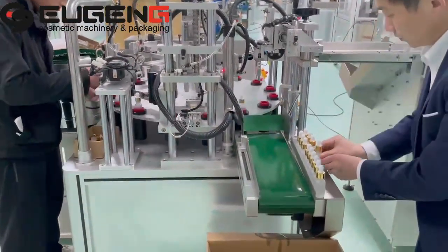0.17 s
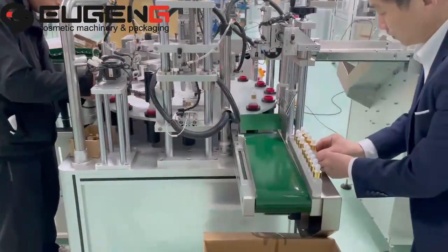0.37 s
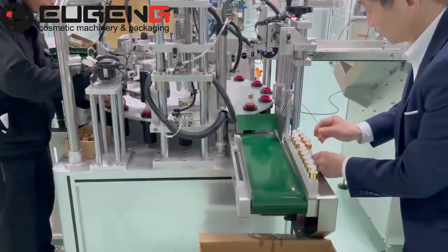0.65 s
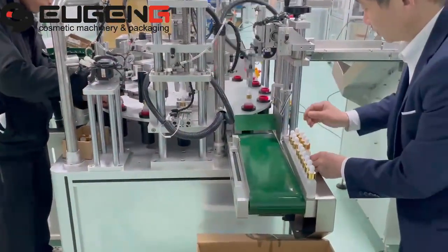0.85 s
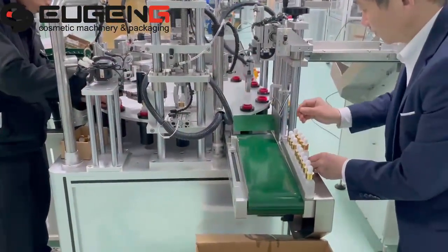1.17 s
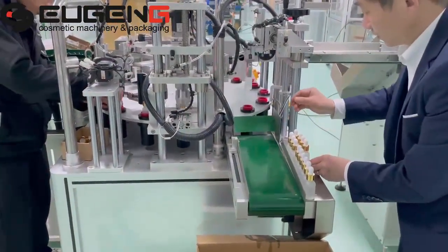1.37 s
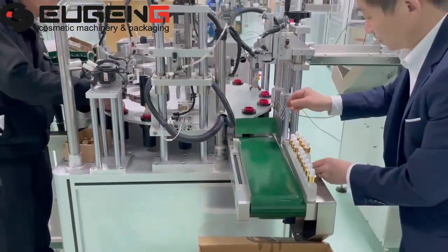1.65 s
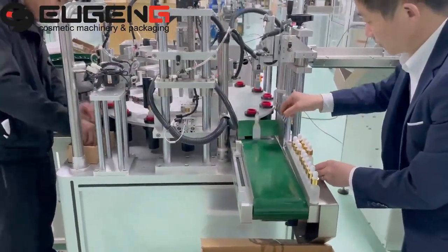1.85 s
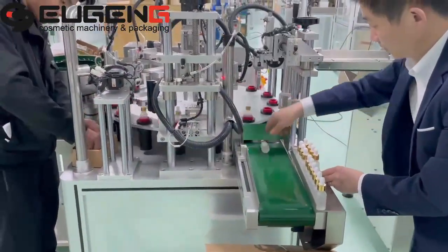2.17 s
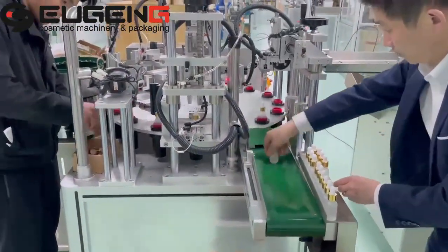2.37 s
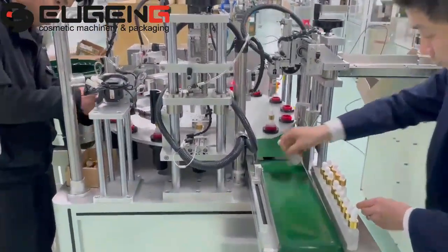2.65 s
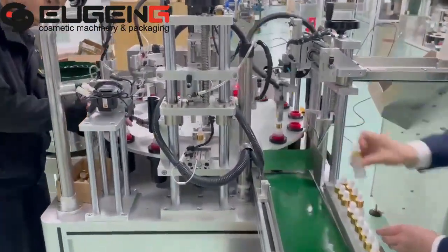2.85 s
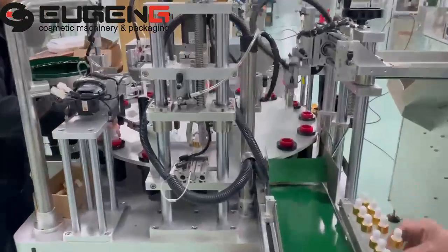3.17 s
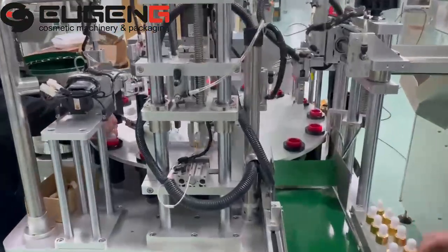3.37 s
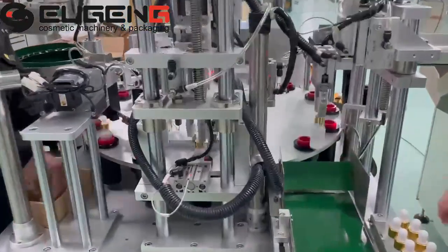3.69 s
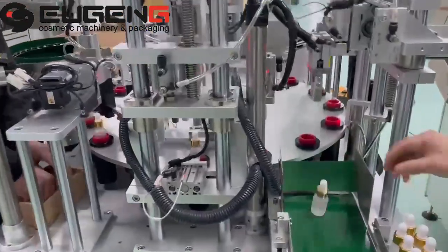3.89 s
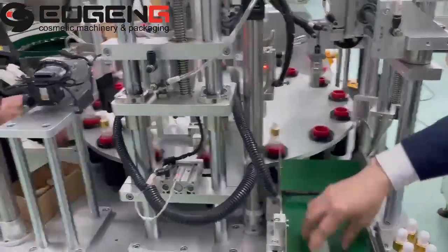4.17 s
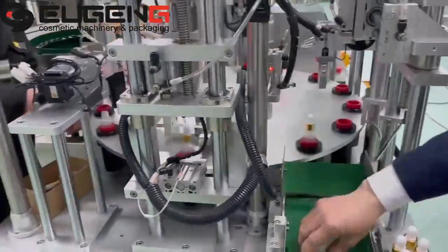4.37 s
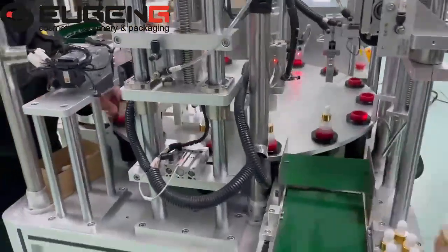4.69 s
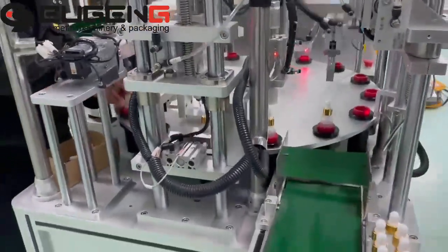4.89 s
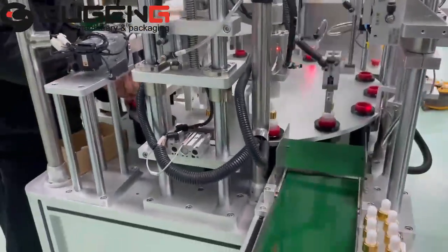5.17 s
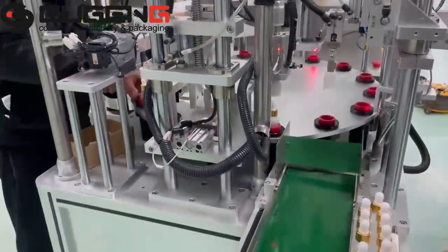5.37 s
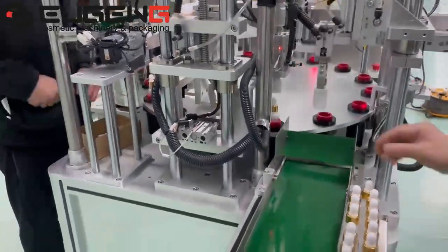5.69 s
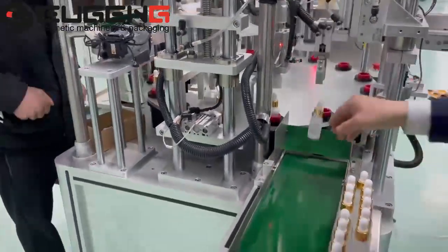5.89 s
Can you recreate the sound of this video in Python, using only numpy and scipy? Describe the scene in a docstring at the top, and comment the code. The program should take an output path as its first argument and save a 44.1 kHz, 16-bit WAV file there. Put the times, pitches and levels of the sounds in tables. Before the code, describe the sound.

An indexing assembly machine clacks and slams in uneven cycles, with air hisses, metallic rings, low cabinet booms and a brief glassy bottle knock in a factory hall.

```python
"""Filling and capping machine in a factory hall

An indexing machine works through its steps close to a two-port microphone. Blows are bursts of shaped
noise with small pings; rods, plates, guards and other parts ring as dying sines, and the steel cabinet
booms with low sines. Air hiss and rumble are noise that swells with each stroke. Motor tones come and
go over the steady wash of the hall, and random reflections give the blows and rings an echo.
"""
import sys
import numpy as np
from scipy import signal
from scipy.fft import rfft, irfft
from scipy.io import wavfile
from scipy.ndimage import uniform_filter1d

SR = 44100
rng = np.random.default_rng(int(sys.argv[2]) if len(sys.argv) > 2 else 0)


def store_wav(level_fs):
    """Save 16-bit WAV to argv[1]."""
    pcm = np.round(np.clip(np.atleast_2d(level_fs), -1, 1) * 32767)
    wavfile.write(sys.argv[1], SR, pcm.T.astype(np.int16))


N = 266364  # length [samples]


def amp(db):
    """Turns a level in dB into a gain."""
    return 10 ** (np.asarray(db) / 20)


def evened(x):
    """Scales a signal to an average (rms) strength of 1."""
    return x / np.sqrt(np.mean(x ** 2) + 1e-20)


def smoothed_twice(x, size):
    """Averages over neighbours two times, so that only slow changes remain."""
    return uniform_filter1d(uniform_filter1d(x, size=size), size=size)


def read(points, hz):
    """Reads a (frequency [Hz], value) table, with straight lines on a log-frequency axis."""
    f, value = np.transpose(points)
    return np.interp(np.log(hz + 1), np.log(f + 1), value)


def add(mix, s, sound):
    """Mixes a sound in at s seconds and cuts off what runs past the end."""
    part = mix[:, round(s * SR):][:, :sound.shape[1]]
    part += sound[:, :part.shape[1]]


def colour(x, db_of):
    """Shapes the spectrum by a function that turns frequency into dB."""
    size = x.shape[-1]
    return irfft(rfft(x) * amp(db_of(np.fft.rfftfreq(size, 1 / SR))), size)


def noise(spectrum, patchy_db, size=1024):
    """Makes two unrelated noises of one spectrum, with shared louder and softer patches."""
    frames, hz = 4 * N // size + 5, np.fft.rfftfreq(size, 1 / SR)
    shape = (2, len(hz), frames)
    z = rng.standard_normal(shape) + 1j * rng.standard_normal(shape)
    patches = rng.standard_normal((len(hz), frames))
    patches = uniform_filter1d(patches, size=10, axis=0)  # over frequency
    patches = evened(uniform_filter1d(patches, size=8, axis=1))  # over time
    z = z * amp(read(spectrum, hz)[:, None] + patchy_db * patches)
    sound = signal.istft(z, nperseg=size, noverlap=3 * size // 4)[1]
    return evened(sound[:, :N])


def hum():
    """A motor hums while a drive runs: a wavering tone with a faint fourth harmonic."""
    # spells of motor tone: (start [s], end [s], pitch [Hz], level [dB])
    motor_spells = [(-0.05, 0.215, 161.4, -41), (0.36, 0.6, 157, -44), (4.337, 4.54, 207, -38),
                    (4.612, 4.922, 208.2, -39.5), (5.928, 6.1, 159.6, -28.5)]
    fade_s, waver_db = 0.054, 0.5
    out, t = np.zeros(N), np.arange(N) / SR
    for on, off, hz, db in motor_spells:
        tone = np.sin(2 * np.pi * hz * t) + 0.14 * np.sin(2 * np.pi * 4 * hz * t)
        fade = np.clip(np.minimum(t - on, off - t) / fade_s, 0, 1)
        out += amp(db) * fade * np.sqrt(2) * tone
    waver = evened(smoothed_twice(rng.standard_normal(N), 3000))
    return out * amp(waver_db * waver)


def wash():
    """The steady wash of the hall is patchy noise, strongest in the bass."""
    # colour of the hall's background: (frequency [Hz], relative level [dB])
    wash_colour = [(25, 6), (60, -5), (160, -5), (270, 0.5), (450, -19.5), (840, -11), (2000, -23),
                   (5700, -55), (9000, -38.5), (13000, -40.5), (16000, -55)]
    return amp(-38.5) * noise(wash_colour, 3.4, size=2048)


def working():
    """Exhaust air hisses and the cabinet rumbles: each stroke runs up fast and runs out slowly."""
    # station strokes: (time of full speed [s], exhaust air level [dB], its extra level above 6.5 kHz [dB],
    # cabinet rumble level [dB], run-out speed [dB/s])
    strokes = [(0.029, -44, 3, -34.5, 25), (0.39, -47, -5, -38, 52), (0.778, -33, 11, -27.5, 71),
               (1.016, -32.5, 5, -24.5, 67), (1.33, -30, -5, -21, 71), (1.45, -38, 6, -30.5, 4),
               (1.698, -21, 5, -16.5, 86), (1.93, -35, 10.5, -47, 23), (2.15, -32, -4, -26, 47),
               (2.701, -33.5, 8, -28.5, 74), (2.958, -32, 8, -25, 75), (3.23, -33, 6, -22.5, 46),
               (3.606, -20, 11, -17, 157), (3.918, -36, -7, -24.5, 58), (4.099, -35.5, 11.5, -29, 42),
               (4.85, -36, 12, -27, 48), (5.109, -32, 6.5, -28, 67), (5.398, -32.5, 2, -22.5, 57),
               (5.748, -17.5, 8, -18.5, 132), (6.02, -30.5, -6, -21.5, 52)]
    # colour of the exhaust air: (frequency [Hz], relative level [dB])
    air_colour = [(200, 8.5), (600, 4), (1500, 7), (3500, 1.5), (6000, -4), (9000, -14.5), (13000, -21.5),
                  (16000, -49)]
    # colour of the cabinet rumble: (frequency [Hz], relative level [dB])
    rumble_colour = [(30, -17), (50, 0), (65, 6.5), (80, -1.5), (105, -1), (135, -4), (270, -9.5),
                     (340, -13), (405, -5), (460, -14.5), (570, -11), (900, -52), (1500, -48)]
    run_up_db_per_s, hold_s = 314, 0.0053
    jet_fade_db_per_s = 74  # the jet loses its sharpness as the pressure drops
    idle_air_db, idle_rumble_db = -55, -41.5

    s, air_db, sharp_db, rumble_db, run_out = np.transpose(strokes)[:, :, None]
    frames = np.arange(0, N + 100, 100) / SR
    since = frames - s  # one row per stroke, negative before full speed
    run_out_db = -run_out * np.maximum(since - hold_s, 0)
    stroke_db = np.minimum(run_up_db_per_s * since, run_out_db)
    sharp_db = np.maximum(sharp_db - jet_fade_db_per_s * np.maximum(since, 0), -4)

    def level(db, idle_db):
        """Adds the power of all strokes to the idle level."""
        power = (amp(db + stroke_db) ** 2).sum(0) + amp(idle_db) ** 2
        return np.interp(np.arange(N) / SR, frames, np.sqrt(power))

    air = noise(air_colour, 2.97)
    top = signal.sosfilt(signal.butter(2, 6500, "high", fs=SR, output="sos"), air)
    low_jets = level(air_db, idle_air_db) * (air - top)
    high_jets = level(air_db + sharp_db, idle_air_db) * top  # fast jets hiss higher
    rumble = level(rumble_db, idle_rumble_db) * noise(rumble_colour, 1.76, size=4096)
    return low_jets + high_jets + rumble


def pings(t60, tilt):
    """Small loose parts knock at random times early in the rattle, each with one short ring of its own."""
    out, t = np.zeros((2, 16384)), np.arange(2048) / SR
    for late, pitch, size, turn in rng.random((7, 4)):  # seven parts
        hz = 602 * 2 ** (3.3 * pitch)  # up to 3.3 octaves above 602 Hz
        ring_s = 75 / np.sqrt(hz * 2000)  # time to fall 60 dB; 75 cycles at 2 kHz
        phase = 2 * np.pi * (hz * t + np.array([[0], [turn]]))
        ping = np.sin(phase) * amp(-60 * t / ring_s)
        db = -3.5 + read(tilt, hz) - 14.0 * late - 11 * size
        add(out, late * t60 / 3, amp(db) * ping)
    return out


def blows():
    """Each blow is a sharp crack and a rattle of loose parts; heavy kinds carry more low end."""
    # every blow: (time [s], level [dB], brightness from 5 kHz up [dB], kind)
    blow_list = [(0.077, -21, -18.5, "knock"), (0.213, -32, -30, "clink"), (0.343, -28.5, -1.5, "shudder"),
                 (0.594, -35.5, -2, "tick"), (0.653, -32, -18, "shudder"), (0.7563, -29, 4.5, "valve"),
                 (0.8, -28, -17, "release"), (0.9672, -25, -5, "index"), (0.981, -26.5, -24, "bounce"),
                 (1.275, -30, -6, "shudder"), (1.287, -17, -12, "clamp"), (1.3094, -20, -22, "bounce"),
                 (1.455, -37, 18, "valve"), (1.514, -12.5, -14, "clunk"), (1.5214, -18.5, -18, "plate"),
                 (1.6534, -13.5, -16, "press"), (1.6905, -6.5, -15, "cap"), (1.7118, -13, -5, "chatter"),
                 (1.7253, -10.5, -3, "chatter"), (1.7776, -29, -34, "bounce"),
                 (1.8743, -13.5, -7.5, "return"), (1.914, -23, -30, "latch"), (2.1097, -13.5, -8, "lift"),
                 (2.1244, -19.5, -20, "bounce"), (2.1594, -17.5, -25, "shudder"), (2.688, -29, 9, "valve"),
                 (2.7353, -14, 3, "chatter"), (2.9016, -22, -9, "index"), (2.925, -26.5, -1, "shudder"),
                 (3.0878, -16.5, -21.5, "clink"), (3.145, -32, 3, "tick"), (3.205, -29, -21, "shudder"),
                 (3.22, -14.5, -12.5, "clamp"), (3.2335, -18.5, -28, "shudder"),
                 (3.259, -19, -22, "shudder"), (3.3227, -26, -30, "bounce"), (3.5608, -10, -11.5, "press"),
                 (3.5755, -11.5, -27, "bounce"), (3.588, -11, -12, "chatter"), (3.596, -9, -14, "chatter"),
                 (3.6132, -4, -16, "cap"), (3.6254, -13, -7, "plate"), (3.778, -13, -8, "return"),
                 (3.8412, -20, -19, "latch"), (3.8596, -26, -11, "latch"), (4.0019, -19, -23, "latch"),
                 (4.0235, -11, -9.5, "lift"), (4.0679, -15, -5, "chatter"), (4.1193, -20, 0, "chatter"),
                 (4.415, -31.5, -20, "bounce"), (4.444, -39, -19, "bounce"), (4.828, -28.5, 6, "valve"),
                 (4.881, -22, -10, "release"), (4.952, -10.5, -14, "bottle"), (4.9603, -16, -23, "bottle"),
                 (5.029, -20.5, -13, "clink"), (5.0496, -20.5, -6, "index"), (5.0694, -27, -20, "shudder"),
                 (5.351, -26, -14, "shudder"), (5.366, -14, -16, "clamp"), (5.3852, -19.5, -20, "shudder"),
                 (5.439, -34, -10, "chatter"), (5.7067, -9.5, -17, "press"), (5.726, -21, -11, "bounce"),
                 (5.7441, -7, -12, "cap"), (5.76, -11, -17, "plate"), (5.784, -11, -7, "chatter"),
                 (5.801, -15, -10, "chatter"), (5.813, -14, -21, "chatter"),
                 (5.9342, -13.5, -5.5, "return"), (5.9552, -15, -12, "latch")]
    # how each kind sounds: (weight from 500 Hz down [dB], time for the rattle to fall 60 dB [s],
    # crack over rattle before they fade [dB], main ring [Hz], its boost [dB], attack [ms]);
    # rattle times under 0.01 s and attacks under 0.1 ms count as those
    kinds = {"valve": (1.1, 0.58, 9.9, 780, 13.7, 7.6), "release": (8, -0.2, -2.5, 971, 7, -1.5),
             "index": (13.4, 0.16, 1.3, 550, 2.5, 2.1), "clamp": (0.67, 0.17, 5.2, 1600, 3, 1.9),
             "press": (-0.5, 0.13, -4, 1147, 0, 2), "cap": (6, 0.0079, -10, 1242, -2, 1),
             "plate": (15.5, 0.07, -0.5, 759, 15, -1.1), "return": (0, 0.14, 4, 2400, 1.5, 2),
             "lift": (0.61, 0.15, 2.3, 1300, 2.3, 0.74), "bounce": (0.5, 0.0962, -5, 1203, 0.5, 0),
             "latch": (7.6, 0.13, 1.5, 1400, 11, 1.1), "bottle": (-11, 0.024, -6.5, 1497, 5, 0.3),
             "knock": (-11, 0.26, -8, 1060, 9.5, 0), "tick": (-32, 0.06, 3.5, 2500, 21, 3),
             "clunk": (2.5, 0.11, -3, 1098, 15.5, 1), "clink": (-10, 0.08, -9, 1750, -2, 3),
             "shudder": (14.5, 0.08, -17, 804, 5.5, 2), "chatter": (3, -0.0535, -12, 1300, 12, 0.3)}
    # colour of the rattle: (frequency [Hz], relative level [dB])
    clack_colour = [(60, -12), (250, 2), (700, 1), (1500, -2.5), (2500, 0), (4000, 0), (6000, 3.5),
                    (9000, -3), (13000, -43), (16000, -15)]
    # colour of the crack: (frequency [Hz], relative level [dB])
    crack_colour = [(300, -34), (1000, -4.5), (2000, -4), (5000, 2.5), (9000, 2.5), (13000, -2),
                    (16000, -7)]
    out = np.zeros((2, N))
    for s, db, bright_db, kind in blow_list:
        weight_db, t60, crack_db, ring_hz, ring_db, attack_ms = kinds[kind]
        t = np.arange(2048 * int(np.clip(2 + 20 * t60, 2, 8))) / SR  # slow rattles get more room
        t60 = max(t60, .01)
        tilt = [(500, weight_db), (1800, 0), (5000, bright_db)]

        # every blow gets its own random bumps in the spectrum
        bumps = rng.standard_normal(len(t) // 2 + 1)
        lumps_db = 1.4 * evened(smoothed_twice(bumps, len(t) // 234))
        grit = rng.standard_normal((2, len(t)))
        wander = uniform_filter1d(rng.standard_normal(len(t)), size=40) * np.sqrt(40)
        grit = grit * amp(2.35 * wander)
        # after the first contact, loose parts bounce in clumps
        bounces = evened(uniform_filter1d(rng.standard_normal(len(t)), size=200))
        clumps = amp(3.1 * bounces * np.minimum(t / 0.014, 1))

        def body_db(hz):
            """Colour of the rattle, with a narrow peak at the main ring."""
            peak = ring_db / (1 + ((hz / ring_hz - 1) / 0.091) ** 2)
            return read(clack_colour, hz) + read(tilt, hz) + lumps_db + peak

        def snap_db(hz):
            """Colour of the crack, with a wider, weaker peak at the main ring."""
            peak = 0.65 * ring_db / (1 + ((hz / ring_hz - 1) / 0.28) ** 2)
            return read(crack_colour, hz) + read(tilt, hz) + lumps_db + peak

        body = evened(colour(grit, body_db))
        crack = colour(grit[:, ::-1], snap_db)  # the same grit backwards
        fall, snap = amp(-60 * t / t60), amp(-60 * t / 0.037)
        # the rattle's energy does not depend on how the parts bounce
        rattle = evened(body * clumps * fall) * np.sqrt(np.mean(fall ** 2))
        crack = amp(crack_db) * evened(crack * snap) * np.sqrt(np.mean(snap ** 2))
        both = rattle + crack + pings(t60, tilt)[:, :len(t)]
        rise = 1 - np.exp(-1000 * t / max(attack_ms, .1))
        add(out, s, amp(db) * both * rise)
    return out


def ringing():
    """Struck parts ring as dying sines; each blow lands a little differently and weights the modes anew."""
    # blows that set one part ringing: (time [s], part, level [dB], hardness tilt around 1 kHz [dB/octave],
    # factor on the ring time, under 1 when the part is held [ratio])
    ring_list = [(0.078, "bottle", -29, 4, 1.1), (1.289, "frame", -23, -3, 1.1),
                 (1.3, "guard", -28.5, -0.5, 0.3), (1.297, "frame", -24, 2, 1.1),
                 (1.33, "frame", -28.5, -3, 0.8), (1.654, "frame", -21.5, -1.5, 1.8),
                 (1.691, "chuck", -27, 1, 1.1), (1.7, "chuck", -27, 0, 0.5), (1.711, "chuck", -27, 1, 0.5),
                 (1.726, "chuck", -20, 0, 0.66), (1.732, "chuck", -11, -3.5, 0.4),
                 (1.777, "chuck", -31, -6, 0.96), (2.111, "frame", -23, -5.5, 1.04),
                 (2.121, "frame", -22, 0, 0.66), (3.089, "bottle", -24.5, 2.5, 1.7),
                 (3.222, "frame", -19.5, 2.5, 1.5), (3.562, "frame", -17, -2.5, 0.88),
                 (3.573, "frame", -24, 1, 0.83), (3.615, "chuck", -20, 1, 1.3),
                 (4.024, "frame", -18, -1, 0.73), (4.9522, "bottle", -13.5, 0, 1),
                 (4.9605, "bottle", -19, 2, 0.75), (5.0285, "bottle", -20.5, 2, 0.51),
                 (5.041, "bottle", -25, 3, 0.87), (5.05, "bottle", -26, -1, 0.7),
                 (5.367, "frame", -21, 0, 1.4), (5.708, "frame", -15, 2.5, 0.83),
                 (5.729, "frame", -24, 3, 0.8), (5.743, "chuck", -19, 0.5, 0.52),
                 (5.756, "chuck", -22, -4, 0.6), (5.783, "chuck", -21, -0.5, 0.6),
                 (5.935, "frame", -27, 0, 1), (1.527, "plate", -24, 1, 0.8), (1.537, "plate", -20, -3, 1.1),
                 (3.23, "frame", -20, -1, 0.91), (3.322, "frame", -32, 2, 0.8),
                 (1.875, "rod", -20.5, 0., 0.67), (1.917, "guard", -26.5, -1, 1.24),
                 (2.734, "rod", -46.5, 9.5, 0.11), (3.235, "guard", -28, -5, 0.81),
                 (3.565, "rod", -16.5, -3.5, 0.14), (3.638, "plate", -16.5, 2, 0.61),
                 (3.779, "rod", -16.5, -2.5, 0.12), (3.779, "guard", -16.5, 10.5, 0.25),
                 (3.842, "guard", -20.5, 3.5, 0.53), (3.862, "guard", -31.5, -2.5, 0.73),
                 (5.071, "guard", -36.5, -7, 0.58), (5.38, "guard", -27.5, -5, 0.65),
                 (5.773, "plate", -18.5, 3, 0.92), (5.955, "guard", -20, 0.5, 0.58)]
    # what each part rings with: (pitch [Hz], relative level [dB], time to fall 60 dB at ring factor 1 [s])
    rod = [(2356, 3.5, 0.81), (2374, 7.5, 0.12), (2570, 0, 0.12), (3020, -7, 0.37), (4020, -12, 0.3),
           (4915, -20, 0.24), (5992, -4, 0.29), (11470, -13.5, 0.23)]
    # modes of the plate, columns as for the rod: ([Hz], [dB], [s])
    plate = [(268, -5, 0.49), (398, -6.5, 0.069), (779.4, 4.5, 0.19), (738, -1, 0.09), (870, -2, 0.07),
             (691, -3, 0.12), (600, 7, 0.037), (980, -4, 0.062), (1170, 2, 0.023), (3930, -9, 0.03),
             (5240, -35, 0.18)]
    # modes of the guard, columns as for the rod: ([Hz], [dB], [s])
    guard = [(407, 5, 0.37), (373, 12, 0.062), (570, -2, 0.046), (1210, 2, 0.24), (1292, 2, 0.2),
             (1487, -4.5, 0.34)]
    # modes of the bottle, columns as for the rod: ([Hz], [dB], [s])
    bottle = [(1420, 3, 0.035), (1600, -5, 0.03), (1717, -3.5, 0.04), (1895, -1.5, 0.05), (2075, -9, 0.07),
              (2570, -16, 0.06), (3780, -13, 0.045)]
    # modes of the chuck, columns as for the rod: ([Hz], [dB], [s])
    chuck = [(3880, -1.5, 0.07), (4550, -1, 0.044), (5370, -6.5, 0.11), (5820, -7, 0.04), (6340, -10, 0.03)]
    # modes of the frame, columns as for the rod: ([Hz], [dB], [s])
    frame = [(558, 1, 0.15), (776, -6, 0.072), (1160, -1, 0.13), (1568, -6.5, 0.1), (2000, -0.5, 0.06),
             (2340, -3.5, 0.057), (2614, -6.5, 0.034), (3490, -16, 0.031)]
    parts = {"rod": rod, "plate": plate, "guard": guard, "bottle": bottle, "chuck": chuck, "frame": frame}
    scatter_turns = 0.094  # all modes of a part start nearly in step
    sag_s, settle_s = 0.00036, 0.0063  # a struck part starts a little sharp and settles
    out = np.zeros((2, N))
    for s, part, db, hard_db, free in ring_list:
        for hz, mode_db, t60 in parts[part]:
            ring_s = t60 * free
            t = np.arange(0, ring_s + .01, 1 / SR)
            # the second arrival is a quarter turn ahead
            phase = 2 * np.pi * (scatter_turns * rng.normal() + np.array([[0], [.25]]))
            # loose mounts make the ring flutter, with a new random level every 20 ms
            flutter_db = 2.5 * np.interp(t * 50, np.arange(100), rng.standard_normal(100))
            spot_db = rng.normal() + flutter_db
            level_db = db + mode_db + hard_db * np.log2(hz / 1000) + spot_db - 60 * t / ring_s
            bent_t = t - sag_s * np.exp(-t / settle_s)
            tone = np.sin(2 * np.pi * hz * bent_t + phase)
            rise = 1 - np.exp(-t * hz / 0.74)  # within about a cycle
            add(out, s, amp(level_db) * tone * rise)
    return out


def thumps():
    """Cylinders ending their stroke shake the cabinet: a slow push sets off its lowest panel modes."""
    # cabinet booms: (time [s], level [dB], main boom [Hz], time for it to fall 60 dB [s])
    booms = [(0.751, -9.5, 90, 0.082), (0.993, -20, 99, 0.17), (1.285, -16, 111.6, 0.1),
             (1.454, -19, 89, 0.15), (1.538, -21, 63, 0.29), (1.696, -23, 66.3, 0.35),
             (1.8, -18, 62.6, 0.2), (2.149, -13, 74.6, 0.15), (2.685, -15, 80.5, 0.13),
             (2.937, -17, 91.5, 0.18), (2.937, -21, 45.8, 0.26), (3.211, -23, 108.4, 0.13),
             (3.579, -17, 100, 0.15), (4.057, -13, 61, 0.2), (4.171, -22, 67.7, 0.42),
             (4.26, -22, 68.9, 0.25), (4.356, -29, 65, 0.18), (4.833, -9.5, 75.5, 0.092),
             (5.084, -16.5, 76, 0.29), (5.734, -10.5, 70.6, 0.19)]
    out, t = np.zeros((2, N)), np.arange(SR // 2) / SR
    for s, db, hz, t60 in booms:
        phases = 0.79 * rng.standard_normal((3, 2, 1))
        panels = 0
        for ratio, gain, phase in zip((1, 1.65, 2.5), (1, .6, .35), phases):
            fall = amp(-60 * t * ratio / max(t60, .03))  # higher modes die faster
            panels = panels + gain * np.sin(2 * np.pi * hz * ratio * t + phase) * fall
        add(out, s, amp(db) * panels * (1 - np.exp(-t / 0.0052)))
    return out


def seatings():
    """A carriage seats against a plate, which swings up for a few cycles and is caught: a swell cut short."""
    # short bursts: (time [s], length [s], middle pitch [Hz], peak level [dB])
    bursts = [(1.513, 0.0048, 1120, -10.5), (1.519, 0.0065, 780, -5), (3.6248, .0075, 818, -4.5),
              (5.7605, 0.0079, 764, -4.5)]
    out = np.zeros((2, N))
    for s, length, hz, db in bursts:
        u = np.arange(0, 1, 1 / (length * SR))  # 0 at the start, 1 at the end
        falling_hz = hz * (1 + 0.16 * (.5 - u))
        turns = np.cumsum(falling_hz) / SR + rng.random() + np.array([[0], [.25]])
        swell = np.sqrt(np.abs(np.sin(np.pi * u ** 1.76)))  # leans toward its end
        add(out, s, amp(db) * swell * np.sin(2 * np.pi * turns))
    return out


def hall(x):
    """Sparse reflections of random sign, each band dying at its own speed, in three patterns by turns."""
    # how long the hall rings: (frequency [Hz], time to fall 60 dB [s])
    hall_times = [(100, 6.5), (260, 0.5), (700, 1.07), (1800, 0.79), (5000, 0.47), (12000, 0.28)]
    taps = np.zeros((3, 2, SR))
    # one reflection at a random place in every 20 samples
    at = np.arange(500, SR - 20, 20) + rng.integers(0, 20, (3, 2, (SR - 501) // 20))
    np.put_along_axis(taps, at, rng.choice([-1., 1.], at.shape), 2)
    hz, t, z = signal.stft(taps, SR, nperseg=256)
    fall = amp(-60 * t / read(hall_times, hz)[:, None])
    tails = signal.istft(z * fall, SR, nperseg=256)[1]
    # the three patterns take turns 23 times a second
    turn = np.pi * (np.arange(N) / SR * 23 + np.arange(3)[:, None, None] / 3)
    places = x * np.cos(turn) ** 2 / np.sqrt(9 / 8)  # keeps the total power steady
    tails = tails / np.linalg.norm(tails[0, 0])
    return signal.fftconvolve(places, tails, axes=2)[..., :N].sum(0)


def scene():
    """Adds all layers into two arrivals of the sound field, one a row."""
    background = hum() + wash() + working()
    knocks, rings, booms, seats = blows(), ringing(), thumps(), seatings()
    # rings and seatings echo less than the blows
    echoes = amp(-10.5) * hall(knocks + amp(-3.5) * rings + amp(-4.5) * seats)
    # sound straight from the machine fills the second arrival less than the hall does
    direct = (knocks + rings + seats) * amp([[0], [-2]])
    return direct + echoes + booms + background


def record(dry):
    """Two ports share part of the field, with a phase gap that changes with pitch; then limits are set."""
    # likeness of the two ports: (frequency [Hz], likeness [0-1])
    likeness = [(60, 0.99), (200, 0.96), (700, 0.49), (1700, 0.36), (4400, 0.54), (6200, 0.36), (7400, 1),
                (9200, 1), (11000, 0.95), (12800, 1), (14500, 0.99)]
    # phase lead of the left port: (frequency [Hz], lead [radians])
    left_lead = [(60, 0), (900, .5), (4400, .1), (5400, 0), (6900, -3.2), (8500, -3.8), (10100, -6.1),
                 (11700, -6.4), (13900, -9.4), (16000, -9.4)]
    # left port over right port: (frequency [Hz], balance [dB])
    balance = [(60, -0.3), (150, -0.4), (380, -0.14), (950, 0.88), (2380, 0.075), (5980, 1), (15000, -0.98)]
    low_hz, edge_hz, ceiling = 36.6, 16300, 1.6
    hz, (a, b) = np.fft.rfftfreq(N, 1 / SR), rfft(dry)
    alike = np.clip(read(likeness, hz), 0, 1)
    tip = amp(read(balance, hz) / 2)
    right = (alike * a + np.sqrt(1 - alike ** 2) * b) * np.exp(-1j * read(left_lead, hz))
    bass_cut = 1 + (low_hz / (hz + 1)) ** 4
    ports = irfft(np.array([a * tip, right / tip]) / bass_cut, N)
    ports = ceiling * np.tanh(ports / ceiling)  # the loudest blows are softly squeezed
    treble_cut = signal.firwin(511, edge_hz, window=("kaiser", 9), fs=SR)
    return signal.oaconvolve(ports, treble_cut[None], "same")


dry = scene()
out = record(dry)
store_wav(out)
```